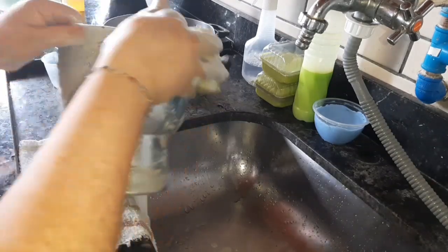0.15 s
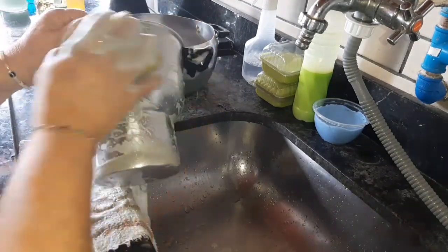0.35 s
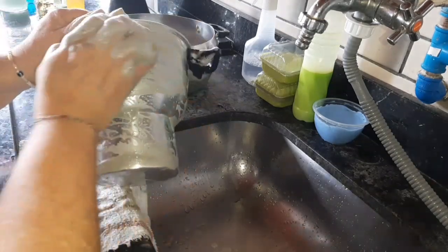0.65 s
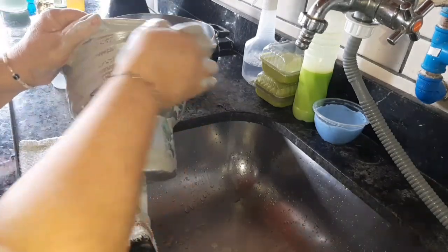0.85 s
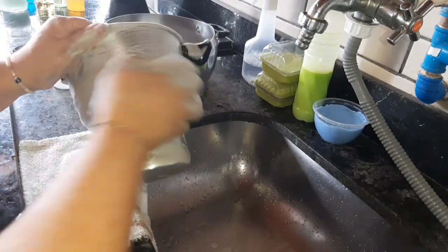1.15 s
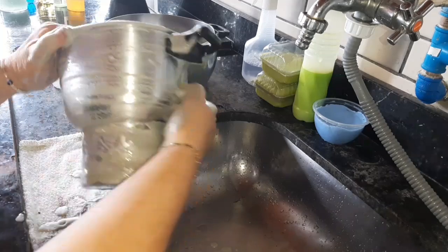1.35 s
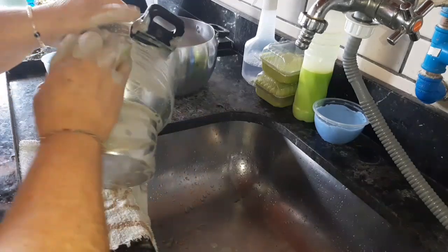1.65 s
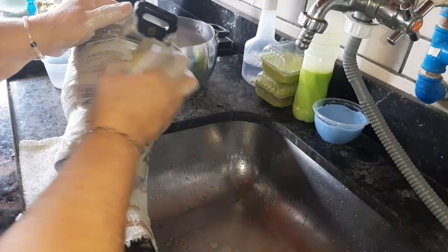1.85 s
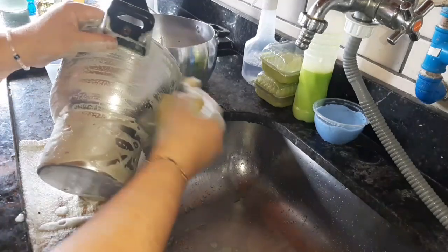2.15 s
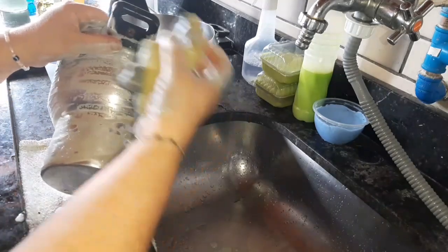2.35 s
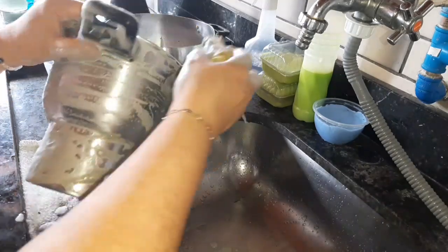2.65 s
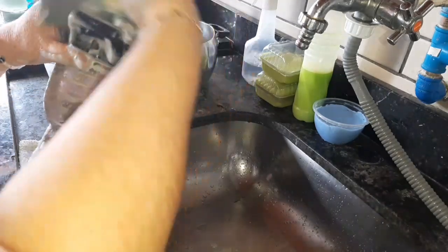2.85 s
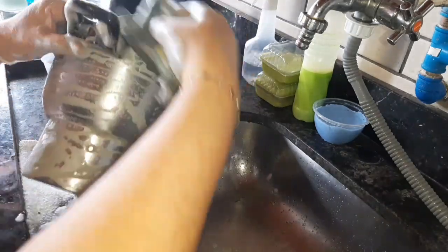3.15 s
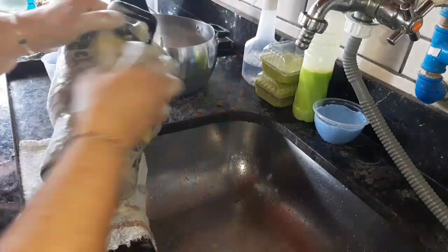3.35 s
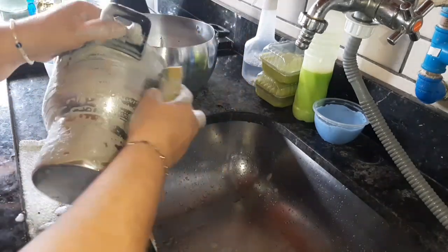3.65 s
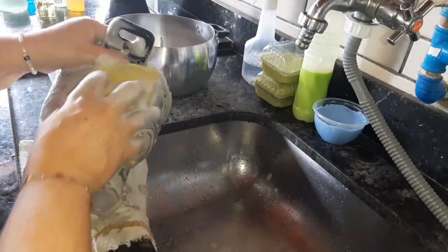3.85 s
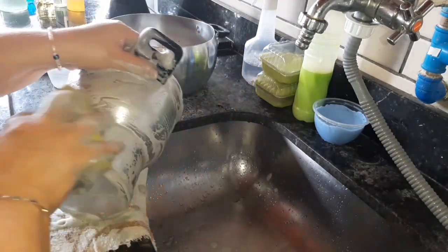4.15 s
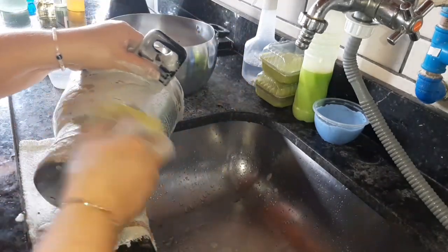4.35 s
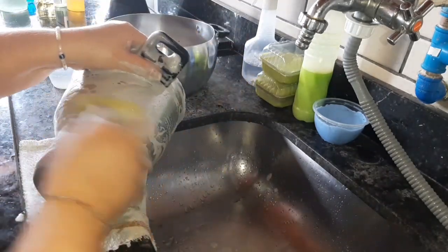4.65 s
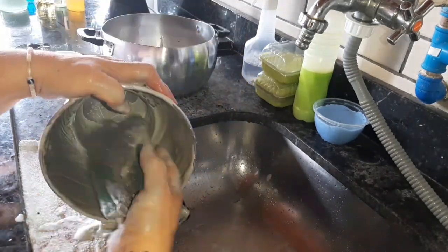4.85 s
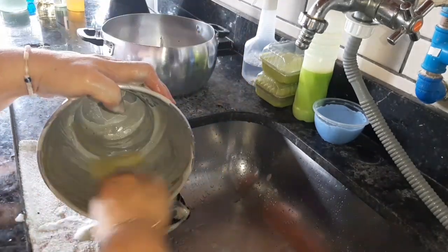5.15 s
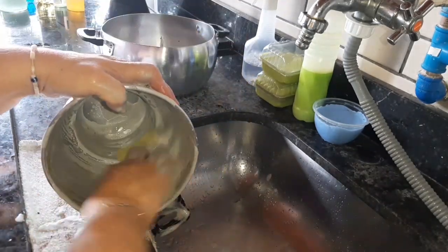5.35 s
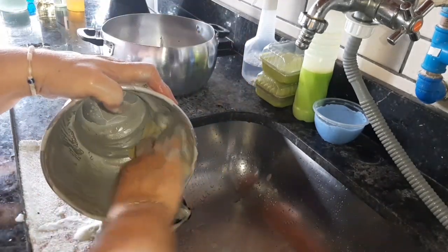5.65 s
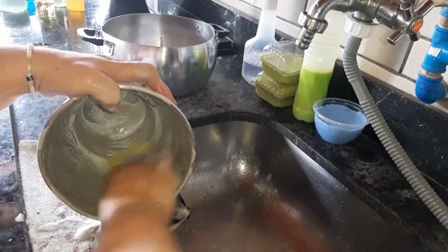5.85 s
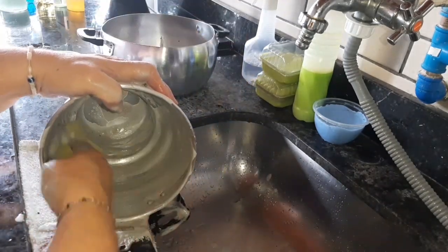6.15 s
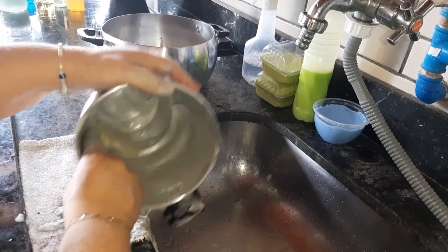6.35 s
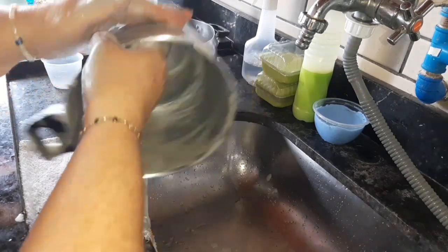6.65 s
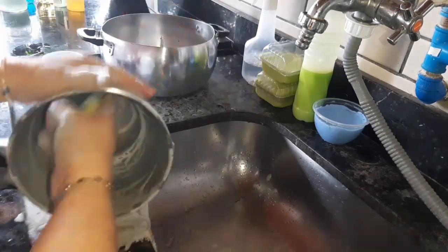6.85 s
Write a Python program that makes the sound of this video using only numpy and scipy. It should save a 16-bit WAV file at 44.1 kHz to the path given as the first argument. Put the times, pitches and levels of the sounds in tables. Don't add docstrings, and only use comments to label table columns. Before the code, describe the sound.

Close stereo sound of a thin metal pot being scoured at a kitchen sink. Quick uneven strokes hiss and scrape, mixed with hollow knocks, small pings and counter thuds as the pot is turned. After a tiny silent gap the scrubbing moves inside, brighter and louder. The pot then drops with a clattering rock, and a hard, heavy knock comes near the end. Low rumble and faint room air lie beneath.

```python
import sys
import numpy as np
from scipy import signal
from scipy.fft import rfft, irfft
from scipy.io import wavfile
from scipy.ndimage import uniform_filter1d

SR = 44100
rng = np.random.default_rng(int(sys.argv[2]) if len(sys.argv) > 2 else 0)


def field_ratio(decibels):
    return 10 ** (np.asarray(decibels, dtype=float) / 20)


def unload_audio(sound):
    columns = np.transpose(np.atleast_2d(sound))
    steps = np.round(np.clip(columns, -1, 1) * 32767)
    wavfile.write(sys.argv[1], SR, steps.astype(np.int16))


N = 308170
TURN_S = 4.76
LAG = 8
MIDDLE_HZ, UPPER_HZ = 620, 1200

# (start [s], length [s], speed [dB], pad pressure [dB], share of the stroke
STROKES_OUTSIDE = [(-.15, 0.28, -61.5, -2.5, 0.28), (0.171, 0.23, -55, -1, 0.43), (.355, 0.16, -50, -8, 0.52),
                   (0.503, .17, -47, -10, 0.57), (0.669, 0.19, -47, -8, 0.56), (0.855, .205, -47, -8.5, 0.62),
                   (1.068, 0.31, -47, -10, 0.24), (1.345, 0.17, -51.5, -5, 0.66), (1.478, 0.22, -51, -6, 0.62),
                   (1.68, 0.18, -46.5, -7, 0.58), (1.851, .13, -46, -6, 0.55), (1.985, 0.18, -46.5, -7, 0.57),
                   (2.17, 0.15, -64.5, 1, 0.33),
                   (2.44, 0.11, -66.5, 7, 0.59), (2.54, 0.12, -56.5, 2, 0.48), (2.66, 0.5, -66, 1, 0.39),
                (2.98, 0.23, -58, 3, 0.54), (3.3, 0.17, -51, -3, 0.68), (3.49, 0.19, -46.5, -7, 0.56),
                (3.69, 0.17, -50, -2.5, 0.5), (3.85, 0.28, -49.5, -6.5, 0.18), (4.05, 0.18, -46.5, -7, .55),
                (4.245, 0.18, -45.5, -8, 0.6), (4.435, 0.17, -46.5, -5.5, 0.55),
                (4.61, 0.15, -48, -8.5, 0.54)]
STROKES_INSIDE = [(4.76, 0.23, -58, -4.5, 0.16), (5.085, .07, -47.5, -7.5, 0.64),
                  (5.15, .19, -40, -11.5, 0.55), (5.345, 0.19, -41, -8, 0.57),
                  (5.525, 0.16, -42.5, -10.5, 0.5), (5.71, 0.14, -41, -8, 0.63),
                  (5.86, 0.14, -40.5, -10, 0.6), (6.025, 0.24, -40, -9, 0.54), (6.295, .12, -49, -5, 0.42),
                  (6.38, 0.48, -60, 1, 0.092), (6.91, 0.22, -47, -8, 0.56)]
# (frequency [Hz], density [dB per Hz])
HISS = [(2940, -3), (5000, -5), (7900, -2.5), (8580, -4), (12400, 2.5), (14900, -2.5), (15600, 2),
        (16000, -33)]
SCRAPE = [(500, -0.5), (1500, 2.5), (2500, 3.5), (4000, -5), (6000, -6), (8500, -11.5), (12000, -30)]
RUMBLE = [(15, -55), (25, -28), (41, -15.5), (70, -4), (108, -0.5), (138, -2.5), (182, -22), (270, -12),
          (400, -15), (520, -50), (880, -120)]
AIR = [(88, -22), (150, 19), (197, -6.5), (398, -4.5), (555, 2), (662, 7), (1240, -12), (2760, -35),
       (12400, -42), (16000, -49)]
# (frequency [Hz], correlation [1])
SAME = [(60, .98), (300, .93), (1500, .75), (2800, .45), (6000, .15), (15000, .05)]
# (frequency [Hz], level difference [dB])
LEFT = [(60, 9.5), (180, 3), (550, 6.5), (1650, 2), (4970, 2), (15000, -2.5)]
# (time [s], freedom of the wall to hum [dB], weight on the counter [dB])
GRIP = [(0.0, -39, -50.5), (.3, -67, -50), (.57, -50.5, -48), (1.13, -43.5, -47.5), (1.35, -54, -51),
        (1.87, -38, -43), (2.2, -40.5, -48), (2.3, -66, -47.5), (3.4, -67, -48), (3.65, -44, -41),
        (3.9, -56, -41.5), (4.15, -48.5, -46.5), (4.9, -58.5, -51.5), (5.14, -49, -45.5), (5.4, -40.5, -45),
        (6.02, -47, -44), (6.48, -45, -50), (6.99, -58, -47.5)]
# (frequency [Hz], level [dB], t60 [s])
POT_OUTSIDE = [(325, -8, .1), (404, -10, .13), (479, -4, .17), (525, -8, .12), (668, -7, .13),
               (829, -7, .2), (990, -8, .12), (1157, -12, .1), (1400, -7, .1), (1690, -5, .11),
               (1810, -6, .11), (1950, -4, .08), (2120, -6, .08), (2680, -13, .05)]
POT_INSIDE = [(375, -8, .1), (440, -4, .11), (500, -10, .1), (675, -8, .12), (834, -12, .16),
              (985, -6, .14), (1110, -12, .1), (1420, -8, .1), (1620, -8, .12), (1814, -1, .13),
              (1981, -5, .1), (2466, -10, .06), (2692, -10, .06), (2900, -12, .06)]
CLANK = [(248.4, -2.5, 0.027), (450, -2, 0.062), (774, -5.5, 0.034), (1050, -8, 0.03), (1510, -15.5, 0.023),
         (1822, 4.5, 0.029), (2280, -8.5, 0.017), (2750, -7, 0.015), (4470, -26.5, 0.039)]
# (time [s], peak level [dB], wall note [Hz], hardness [dB])
KNOCKS_OUTSIDE = [(.194, -27, 312, -9), (.216, -14.5, 492, 2), (.261, -25.5, 494, -18), (.293, -31, 450, -5),
                  (.38, -30.5, 500, -11), (.488, -27.5, 337, -22), (.493, -25.5, 447, -17.5),
                  (.53, -19, 513, -4.5), (.612, -32.5, 335, -12), (.71, -23.5, 471, -21),
                  (.726, -22, 442, -20.5), (.817, -21, 454, -16.5), (.825, -20, 428, -12.5),
                  (.897, -34.5, 590, -25), (.916, -27, 338, -8), (.966, -31, 450, -24), (.984, -16.5, 344, -2),
                  (1.074, -31.5, 613, -16),
                  (1.331, -20, 310, 4), (1.343, -27, 454, -19), (1.443, -53, 477, -21),
               (1.497, -17.5, 486, -8), (1.604, -30, 520, -19), (1.636, -20.5, 370, -16),
               (1.741, -31.5, 478, -12), (1.786, -12.5, 625, -9.5), (1.797, -20.5, 475, -17),
               (1.878, -17.5, 516, -8), (1.957, -31, 297, -20), (1.967, -27, 325, -10),
               (2.019, -24.5, 293, -15), (2.058, -13.5, 495, -10.5), (2.155, -15, 434, -2),
               (2.485, -31.5, 520, -14.5), (2.6, -16, 542, 4.5), (2.884, -35, 504, -19.5),
               (2.994, -20.5, 482, -7.5), (3.189, -32, 503, -8), (3.375, -30, 494, -12),
               (3.398, -17, 516, -8), (3.611, -16, 510, -1.5), (3.756, -31, 286, -32),
               (3.86, -26, 290, -7.5)]
KNOCKS_INSIDE = [(5.098, -26.5, 410, -34), (5.112, -31.5, 442, -28), (5.634, -32.5, 394, -28),
                 (5.656, -27, 410, -25), (5.67, -22.5, 395, -20), (5.737, -35.5, 433, -17),
                 (5.817, -13.5, 407, -13), (5.973, -30.5, 430, -34), (6.148, -16, 420, -9),
                 (6.368, -16, 454, -9), (6.447, -45, 436, -16), (6.466, -32, 425, -22),
                 (6.523, -23, 450, -8), (6.749, -45, 484, -20), (6.941, -17.5, 380, -11)]
KNOCKS_FURTHER = [
    (6.923, -14, 320, -6),
    (6.375, -10.5, 447, -8),
    (6.387, -11, 490, -5),
    (6.409, -12, 436, -14),
]
# (time [s], peak level [dB])
SNAGS = [(0.215, -38), (.825, -36), (1.444, -37), (1.637, -36), (1.957, -39), (1.966, -33), (2.485, -42.5),
         (3.611, -40), (3.756, -34), (5.098, -38.5), (5.817, -27), (6.148, -37), (6.367, -23.5),
         (6.749, -50), (6.923, -31.5)]
# (time [s], peak level [dB], frequency [Hz], t60 [s])
PINGS = [(.535, -34, 1790, 0.13), (5.818, -21, 2300, 0.038), (.73, -29, 1810, 0.078),
         (3.19, -33.5, 484, 0.14), (.22, -23, 486, 0.15), (2.157, -25, 1900, 0.084),
         (2.601, -37, 1850, .14), (6.929, -26, 2300, .06), (2.995, -29.5, 485, 0.16),
         (3.404, -36, 829, 0.36), (6.378, -16, 960, 0.12), (6.378, -18, 1808, 0.12),
         (6.387, -24, 2650, 0.037)]
THUDS = [(0.525, -34, 274, 0.088), (0.98, -22.5, 280, 0.067), (1.637, -33.5, 279, 0.12),
         (1.967, -20, 111, 0.037), (3.778, -9.5, 112, 0.025), (3.858, -30, 273, 0.1),
         (4.281, -32.5, 100.6, 0.16), (5.094, -26, 127, 0.073), (6.92, -14, 122.6, 0.12),
         (6.953, -8.5, 166, 0.035), (6.972, -15, 117, 0.054)]
SLAM = (6.9245, 2.2, 422, 0.033)
# (frequency [Hz], t60 [s])
ROOM = [(100, 0.12), (500, 0.29), (2000, 0.19), (6000, 0.18)]
# (time [s], level [dB])
SCENE_CHANGE = [
    (4.71, 2),
    (4.745, -23),
    (4.752, -60),
    (4.776, -57),
    (4.782, -16),
    (4.81, -0.5),
]


def evened(x):
    return x / np.sqrt(np.mean(x ** 2) + 1e-20)


def read(points, hz):
    f, value = np.transpose(points)
    return np.interp(np.log(hz + 1), np.log(f + 1), value)


def level(table, column):
    rows = np.transpose(table)
    return field_ratio(np.interp(np.arange(N) / SR, rows[0], rows[column]))


def add(mix, s, sound):
    part = mix[..., round(s * SR):][..., :sound.shape[-1]]
    part += sound[..., :part.shape[-1]]


def grit(per_s, spread_db):
    size = field_ratio(spread_db * np.minimum(rng.exponential(1, (2, N)), 5))
    slips = rng.random((2, N)) < per_s / SR
    return rng.standard_normal((2, N)) * size * slips


def ports(pair):
    hz, z = np.fft.rfftfreq(N, 1 / SR), rfft(pair)
    same = read(SAME, hz)
    delay = np.exp(-2j * np.pi * hz * LAG / SR)
    right = (same * z[0] + np.sqrt(1 - same ** 2) * z[1]) * delay
    tilt = field_ratio(read(LEFT, hz) / 2)
    return irfft(np.array([z[0] * tilt, right / tilt]), N)


def coloured(pair, spectrum, patchy_db, size=512):
    hz, t, z = signal.stft(pair, SR, nperseg=size, noverlap=size * 3 // 4)
    patches = uniform_filter1d(rng.standard_normal((len(hz), len(t))), size=8, axis=0)
    patches = evened(uniform_filter1d(patches, size=12, axis=1))
    z = z * field_ratio(read(spectrum, hz)[:, None] + patchy_db * patches)
    shaped = signal.istft(z, SR, nperseg=size, noverlap=size * 3 // 4)[1]
    return evened(ports(shaped[:, :N]))


def ring(modes, gains_db, damping=0.86, size=SR // 3, rise=0.00031):
    hz, db, t60 = np.transpose(modes)[:, :, None]
    t = np.arange(size) / SR
    decay = field_ratio(db + gains_db[:, None] - 60 * t / (t60 * damping))
    return (decay * np.sin(2 * np.pi * hz * t)).sum(0) * (1 - np.exp(-t / rise)) ** 2


def hand():
    overlap_s, roundness, rest_db, scrape_follows, tremble_db = .012, 0.79, -76, 0.7, 1.
    t = np.arange(N) / SR
    speed, press = field_ratio(2 * rest_db), field_ratio(2 * rest_db + 12)
    for start, length, speed_db, press_db, lean in STROKES_OUTSIDE + STROKES_INSIDE:
        u = np.clip((t - start + overlap_s) / (length + 2 * overlap_s), 0, 1)
        warp = np.log(.5) / np.log(np.clip(lean, .05, .95))
        arch = abs(np.sin(np.pi * u ** warp)) ** (2 * roundness)
        speed = speed + field_ratio(2 * speed_db) * arch
        press = press + field_ratio(2 * (speed_db + press_db)) * arch ** scrape_follows * (arch > 1e-9)
    shake = uniform_filter1d(rng.standard_normal(N), size=700)
    shake = evened(uniform_filter1d(shake, size=700))
    return np.sqrt([speed, press]) * field_ratio(tremble_db * shake)


def wool():
    wires = [(3000, -40)] + list(HISS)
    hiss = coloured(grit(per_s=16000, spread_db=1.2), wires, patchy_db=.8)
    scrape = coloured(grit(per_s=7000, spread_db=2), SCRAPE, patchy_db=1.6)
    speed, press = hand()
    return field_ratio(1.5) * hiss * speed + field_ratio(7.5) * scrape * press


def murmur(slips, pot):
    upper_db = -7.5 * (np.transpose(pot)[0] > UPPER_HZ)
    wall = ring(pot, upper_db, damping=0.16)
    return evened(signal.oaconvolve(slips, wall[None], axes=1)[:, :N])


def hum():
    slips = grit(per_s=2500, spread_db=2)
    inside = np.arange(N) > TURN_S * SR
    walls = np.where(inside, murmur(slips, POT_INSIDE), murmur(slips, POT_OUTSIDE))
    return field_ratio(-3.5) * evened(ports(walls)) * level(GRIP, 1)


def kitchen():
    rumble = coloured(rng.standard_normal((2, N)), RUMBLE, patchy_db=-1.5, size=2048)
    air = coloured(rng.standard_normal((2, N)), AIR, patchy_db=.9)
    return rumble * level(GRIP, 2) + field_ratio(-59) * air


def tick(peak_db):
    chatter = rng.uniform(-.5, .5, 400) * np.exp(-np.arange(400) / SR / .003)
    band = signal.butter(2, [2200, 7500], "band", fs=SR)
    return field_ratio(peak_db + 18.5) * signal.lfilter(*band, chatter)


def knock(s, peak_db, hz, upper_db):
    middle_db = min(-2.5 + 0.57 * upper_db, -7)

    def share_db(f):
        return np.select([f > UPPER_HZ, f > MIDDLE_HZ], [upper_db + 13.0, middle_db + 13.5], 0)

    pot = np.array(POT_INSIDE if s > TURN_S else POT_OUTSIDE, float)
    pot[:, 0] *= rng.uniform(.975, 1.025, len(pot))
    place_db = rng.uniform(-5, 5, len(pot))
    body = ring(pot, place_db + share_db(pot[:, 0]) - 6.5, damping=rng.uniform(.32, .59))
    add(body, 0, ring([(hz, 1.5, .07)], np.zeros(1)))

    f, db, t60 = np.transpose(CLANK)
    crowd_hz = np.linspace(f[0] ** .5, f[-1] ** .5, 48) ** 2 * rng.uniform(.95, 1.05, 48)
    crowd = np.transpose([crowd_hz, np.interp(crowd_hz, f, db), np.interp(crowd_hz, f, t60)])
    crowd_db = share_db(crowd_hz) + rng.uniform(-9.0, -1.4, 48)
    mixed = crowd.copy()
    mixed[:, 0] *= rng.choice([-1, 1], 48)
    add(body, 0, ring(mixed, crowd_db, size=4000))
    add(body, .0012, ring(crowd, crowd_db - 4.0, damping=0.25, size=1000))

    body = field_ratio(peak_db + 3.0) * body / abs(body[:900]).max()
    add(body, .001, tick(-49 + 0.29 * (peak_db + 23.5)))
    return body


def note(peak_db, hz, t60):
    t = np.arange(SR // 4) / SR
    decay = field_ratio(peak_db - 1.0 - 60 * t / t60)
    return decay * np.sin(2 * np.pi * hz * t) * (1 - np.exp(-t / 0.0015))


def room(x):
    taps = np.zeros((2, SR // 2))
    at = np.arange(200, SR // 2 - 20, 20)
    at = at + rng.integers(0, 20, (2, len(at)))
    np.put_along_axis(taps, at, rng.choice([-1., 1.], at.shape), 1)
    hz, t, z = signal.stft(taps, SR, nperseg=256)
    z[1, :3] = z[0, :3]
    tail = signal.istft(z * field_ratio(-60 * t / read(ROOM, hz)[:, None]), SR, nperseg=256)[1]
    return signal.fftconvolve(x, tail / np.linalg.norm(tail[0]), axes=1)[:, :N]


def scene():
    blows = np.zeros(N)
    for row in KNOCKS_OUTSIDE + KNOCKS_INSIDE + KNOCKS_FURTHER:
        add(blows, row[0] + .001, knock(*row))
    for s, *mode in list(THUDS) + PINGS + [SLAM]:
        add(blows, s, note(*mode))
    for s, peak_db in SNAGS:
        add(blows, s + .002, tick(peak_db))
    hz = np.fft.rfftfreq(N, 1 / SR)
    shade_db = read([(100, -7.0), (500, -4.5), (2000, -2.5), (8000, -15.5)], hz)
    right = np.roll(irfft(rfft(blows) * field_ratio(shade_db), N), LAG)
    right = right + .55 * np.roll(np.diff(right, prepend=0), 37) * 4
    pair = field_ratio(2.0) * np.array([blows, right])
    return pair + field_ratio(-6.5) * room(pair) + wool() + hum() + kitchen()


def roll_off(x):
    return signal.sosfilt(signal.butter(12, 16650, fs=SR, output="sos"), x)


def record(dry):
    x = signal.sosfilt(signal.butter(4, 48, "high", fs=SR, output="sos"), dry)
    lowpass = signal.firwin(401, 15650, window=("kaiser", 7), fs=SR)
    x = signal.oaconvolve(x, lowpass[None], "same")
    return roll_off(x * level(SCENE_CHANGE, 1))


dry = scene()
out = record(dry)
unload_audio(out)
```